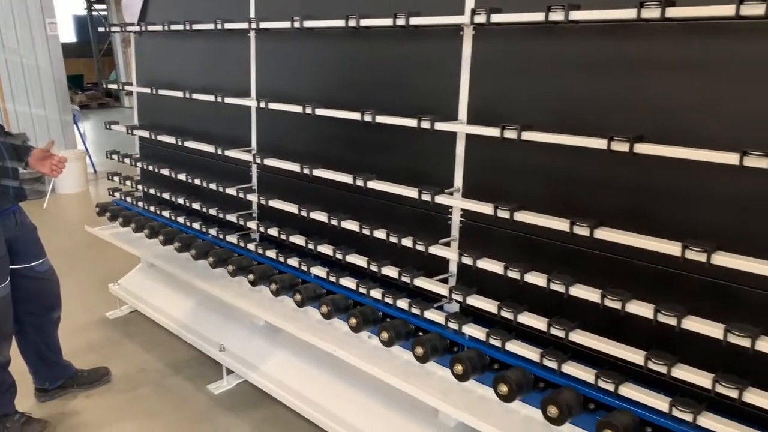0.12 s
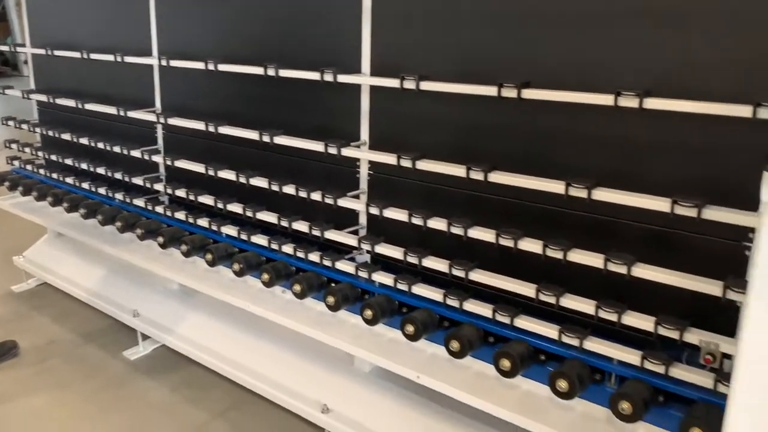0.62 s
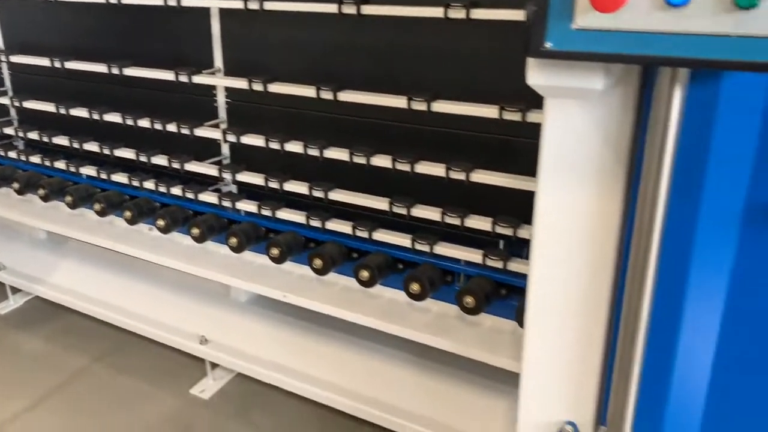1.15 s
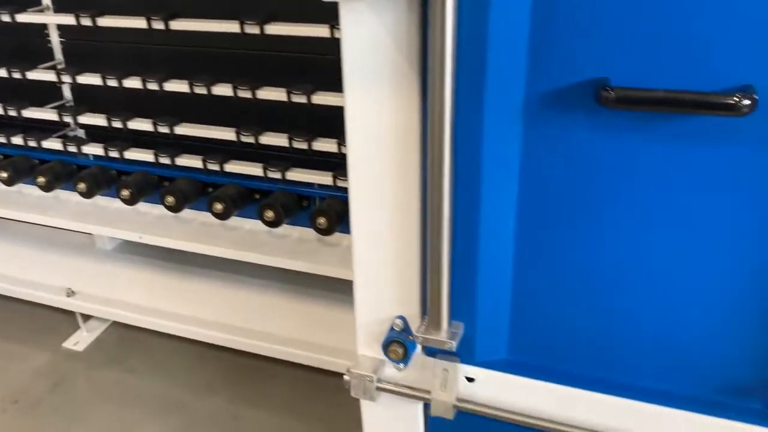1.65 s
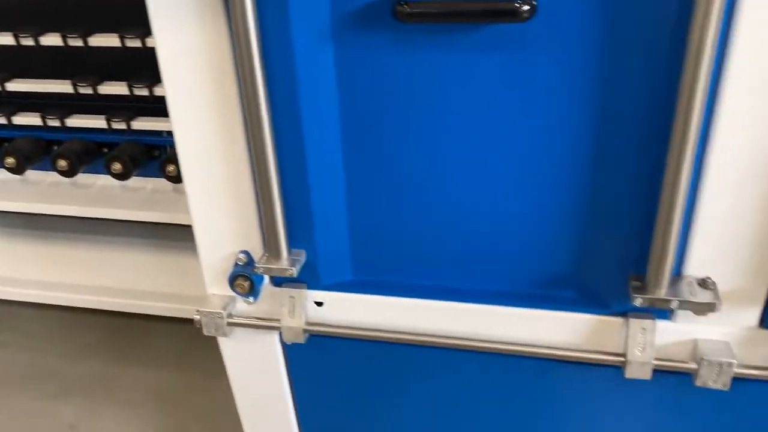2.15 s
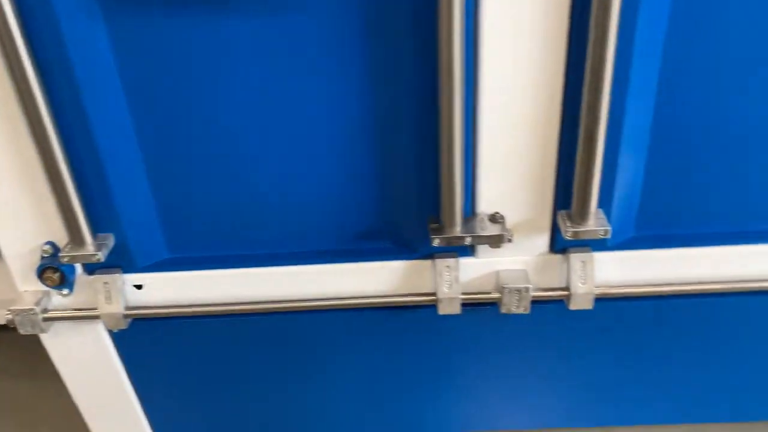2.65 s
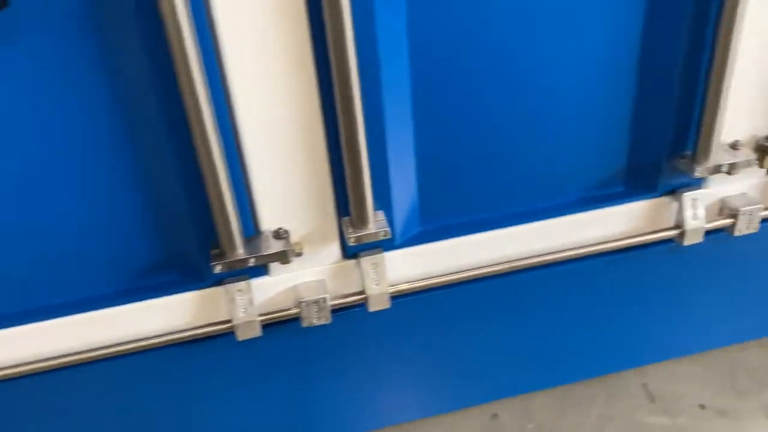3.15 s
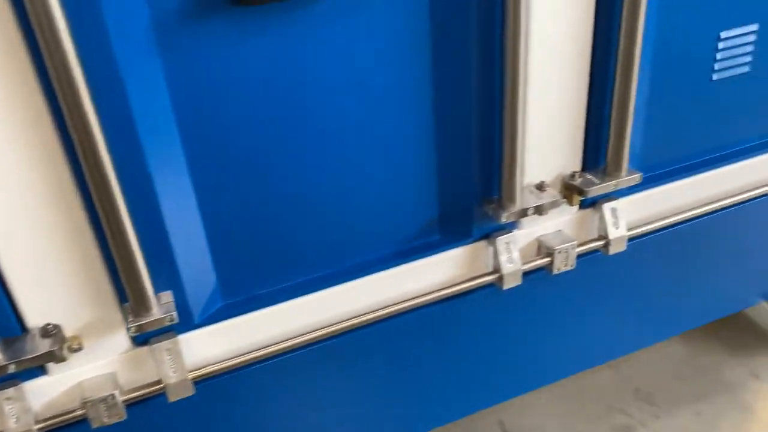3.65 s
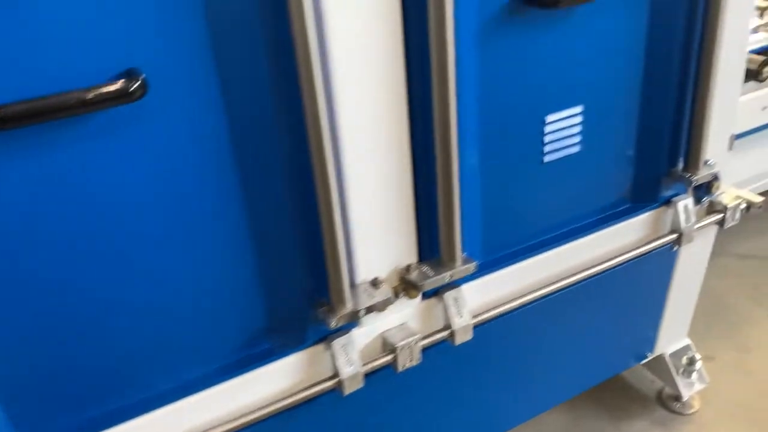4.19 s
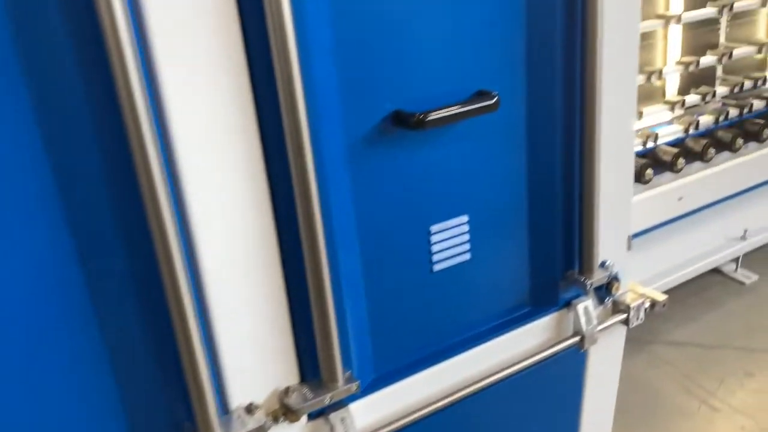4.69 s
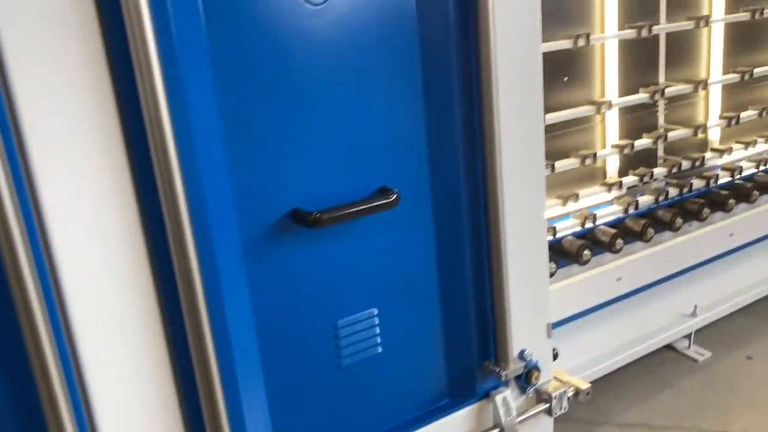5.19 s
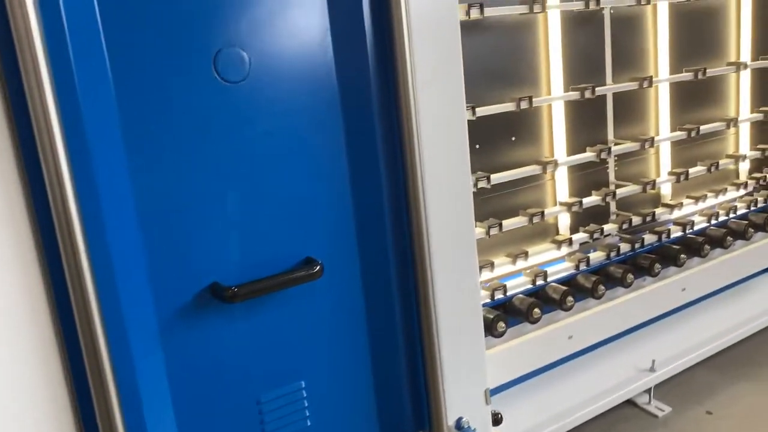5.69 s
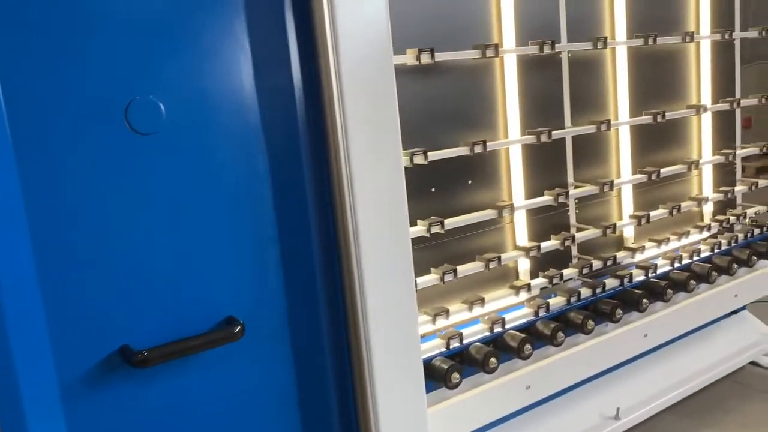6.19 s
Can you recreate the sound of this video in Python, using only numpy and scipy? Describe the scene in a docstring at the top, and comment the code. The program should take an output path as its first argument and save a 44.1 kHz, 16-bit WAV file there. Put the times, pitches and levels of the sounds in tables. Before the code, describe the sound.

In a reverberant factory hall, a big washing machine runs without pause. A blower's low, rushing roar and a deep booming drone dominate, with motor hum underneath. Grainy water spray swells in small surges, a thin air hiss sits on top, and faint conveyor rattles tick through. Heard in stereo by a microphone carried along the cabinet, the tone shifts gradually and a breathy whistle appears near the end.

```python
"""A drying blower roars through the ducts and sheet panels of a glass washer in a factory hall. The listener
walks along its cabinet: motors hum at their shaft rates, water sprays on brushes in surges, the conveyor
rattles faintly and an air knife hisses. Air and water are coloured noise, motors are wavering tones, and
rattles are tiny knocks that make metal ring. Two microphone ports a hand apart hear the air, water and motors
from the right."""
import sys
import numpy as np
from scipy import signal
from scipy.fft import rfft, irfft
from scipy.io import wavfile

SR = 44100
rng = np.random.default_rng(int(sys.argv[2]) if len(sys.argv) > 2 else 0)


def natural_amplitude(level_db):
    """Convert a level in decibels to a linear amplitude factor, elementwise."""
    exponent = np.asarray(level_db, float) / 20
    return 10 ** exponent


def wrap_up_sound(samples):
    """Save the sound to the file named by the first command line argument, as 16-bit audio."""
    columns = np.atleast_2d(samples).T
    # keep every value between -1 and 1, then stretch to whole-number steps
    tamed = np.clip(columns, -1, 1)
    steps = np.round(tamed * 32767).astype(np.int16)
    wavfile.write(sys.argv[1], SR, steps)


N = 278712
NOW = np.arange(N) / SR   # time of each sample, s
HZ = np.maximum(np.arange(N // 2 + 1) * SR / N, 1)   # pitches of the spectrum; from 1 so that its log exists


def in_time(rows):
    """Draws straight lines between the rows of a table, giving each column a value at every sample."""
    times, *columns = np.transpose(rows)
    return [np.interp(NOW, times, column) for column in columns]


def at_hz(points, column=1):
    """Reads a table column at every pitch of the spectrum, with pitch spaced in octaves."""
    points = np.array(points)
    return np.interp(np.log(HZ), np.log(points[:, 0]), points[:, column])


def drift(rate_hz):
    """Slow random wandering around 0 with spread 1: noise smoothed twice, made at every 40th sample."""
    r = np.exp(-2 * np.pi * rate_hz * 40 / SR)
    noise = rng.standard_normal(N // 40 + 2002)
    slow = signal.lfilter([1], [1, -2 * r, r * r], noise)[2000:]   # drop the filter's start
    return np.interp(np.arange(N) / 40, np.arange(len(slow)), slow / slow.std())


def uncovered(hidden_db, open_db, half_s, passage_s):
    """Level in dB as the cabinet ceases to shield a source; a negative passage_s runs it backwards."""
    return hidden_db + (open_db - hidden_db) / (1 + np.exp((half_s - NOW) / passage_s))


def standing(mean_db, db_per_s, crest_s, spacing_s, echo):
    """Level in dB where a wave meets its wall echo (0-1), crest and trough passing in turn."""
    both = 1 + echo * np.exp(2j * np.pi * (NOW - crest_s) / spacing_s)
    return mean_db + db_per_s * (NOW - NOW.mean()) + 20 * np.log10(np.abs(both))


# Pitches that ducts, panels and hall favour or swallow. Columns: pitch_hz, width_hz, lift_db
RESONANCE_TABLE = [(76.5, 6.5, -6.5), (97.5, 5.6, -7), (122, 3.8, 0), (130.4, 7.8, 5), (153.7, 15, 2),
                   (164.3, 17, 4.5), (184.7, 20.5, -9), (207, 4.4, -5.5), (213.7, 12.3, 5.5), (251, 9.9, 1),
                   (269.5, 14, 4.5), (284.5, 37, -7), (326, 20, 0.5), (342.4, 15.6, 3), (354, 10, 0.5),
                   (389, 33, 2), (439, 19, 2.5), (660, 110, 3.5), (770, 44, -1.5), (876, 130, 5),
                   (982, 34, 4.5), (1029.7, 50, -1.5), (1126, 34, 5.5), (1158, 37, -2.5), (1270, 89, 3.5),
                   (1350, 34, 5), (1400, 38, -5.5), (2523, 260, 4.5), (2940, 82, -2), (3030, 83, 3.5),
                   (3100, 82, 1.5), (4300, 210, 2.5), (4620, 200, -2), (9480, 200, 0)]


def body_db():
    """Bell-shaped lifts and dips of the cabinet and hall, in dB."""
    return sum(lift_db / (1 + (2 * (HZ - hz) / width_hz) ** 2) for hz, width_hz, lift_db in RESONANCE_TABLE)


# How the two ports hear each pitch. Columns: pitch_hz, likeness (0-1), left_minus_right_db
PORT_TABLE = [(50, .99, -2.3), (150, .93, -2.3), (300, .82, -1.7), (450, .5, -1.3), (650, .1, -1.2),
              (1000, .2, 0), (1400, .4, -.4), (2000, .22, -.4), (2800, .15, -.8), (3500, .1, -1.2),
              (4300, .4, -1.6), (5300, .1, -3.5), (6500, .45, -2), (7500, .8, 0), (8800, .98, .2)]


def at_ports(shared, own):
    """Spectra at the two ports: a shared wave reaching the left later, plus diffuse sound of each."""
    alike = at_hz(PORT_TABLE)
    left_lag_s = 9.6 / SR
    late = np.exp(-2j * np.pi * HZ * left_lag_s)
    delays = np.array([late, np.ones_like(late)])
    pair = np.sqrt(alike) * shared * delays + np.sqrt(1 - alike) * own
    half_gap_db = at_hz(PORT_TABLE, column=2) / 2
    return pair * natural_amplitude(half_gap_db * np.array([[1], [-1]]))


def hall(x, echo_db=-17.0, walk_m_s=0.6008, count=6):
    """Echoes off floor, walls and machines; walking changes their paths, so thin bands swell and slide."""
    out, sample = x.copy(), np.arange(N)
    for path_m, heading in rng.uniform([2.0, -1], [14.0, 1], (count, 2)):
        path_now_m = path_m + heading * walk_m_s * (sample - N / 2) / SR
        lag = path_now_m / 343 * SR   # sound covers 343 m/s
        out += natural_amplitude(echo_db) * np.array([np.interp(sample - lag, sample, side, period=N) for side in x])
    return out / np.sqrt(1 + count * natural_amplitude(2 * echo_db))


def turbulence(colour, patchy_db, patch_rate_hz, grain_db=0, count=2):
    """Coloured stereo noise whose bands, count to the octave, swell alone; grain roughens it into droplets."""
    grain = rng.standard_normal(N // 32 + 1).repeat(32)[:N]   # a new level every 32 samples
    source = rfft(rng.standard_normal((3, N)) * natural_amplitude(grain_db * grain))
    spectra = at_ports(source[0], source[1:]) * natural_amplitude(at_hz(colour) + body_db())
    lowest, highest = np.log2(colour[0][0]), np.log2(colour[-1][0])
    out = 0
    for centre in np.arange(lowest, highest + 1 / count, 1 / count):
        # neighbouring windows sum to one
        window = np.cos(np.pi / 2 * np.clip(count * (np.log2(HZ) - centre), -1, 1)) ** 2
        out = out + irfft(spectra * window, N) * natural_amplitude(patchy_db * drift(patch_rate_hz))
    return out / out.mean(axis=0).std()


def ring(drive, hz, t60_s):
    """One mode of a metal part: struck by the drive, it swings at its pitch and fades 60 dB in t60_s."""
    r, w = natural_amplitude(-60 / (t60_s * SR)), 2 * np.pi * hz / SR
    return signal.lfilter([0, np.sin(w)], [1, -2 * r * np.cos(w), r * r], drive + 1e-18)


# Faint rattles, each nearest the part that rings at its pitch. Columns: middle_s, level_db, pitch_hz
RATTLE_TABLE = [(.1, -52, 2440), (1.14, -48, 4210), (1.78, -52, 3025), (1.9, -50, 5300), (2.2, -47, 3210),
                (2.54, -44.5, 3025), (2.61, -44.5, 4300), (3.47, -51, 4420), (3.6, -48, 3025),
                (3.74, -46.5, 3790), (3.88, -49.5, 3025), (4.05, -48, 2530), (4.33, -45.5, 5300),
                (4.42, -48.5, 2530), (4.5, -51, 4420), (4.84, -47, 2100), (4.87, -48.5, 2450),
                (5.08, -49.5, 2530), (5.35, -48, 2530), (5.4, -50, 5300), (5.44, -54.5, 4210),
                (5.89, -46, 4420)]
# What the conveyor rings with. Columns: pitch_hz, level_db, t60_s
CONVEYOR_MODES = [(1444, -0.5, 0.15), (1873, -2, 0.13), (2100, -2.5, 0.1), (2440, -5.5, 0.07),
                  (2540, -1.5, 0.07), (3025, -2, 0.065), (3210, -5, 0.097), (3260, -10, 0.078),
                  (3640, -8.5, 0.06), (3790, -5.5, 0.06), (4210, -6, 0.076), (4420, -9.5, .06),
                  (5300, -10, 0.063)]


def rattles(burst_s=0.029):
    """Short runs of tiny knocks; each run strikes every mode with a strength of its own."""
    knocks = rng.standard_normal((2, N)) * (rng.random(N) < 500 / SR)   # about 500 a second
    knocks = (knocks + knocks[0]) / 2   # the right port shares part of the left's knocks
    # modes within about 0.04 octave of a rattle's pitch ring up to 8 dB louder than distant ones
    apart = np.log2(np.array(RATTLE_TABLE)[:, 2:] / np.array(CONVEYOR_MODES)[:, 0]) / 0.04
    nearness_db = 8.0 * (np.exp(-.5 * apart ** 2) - .5)
    strengths_db = rng.normal(0, 2.0, apart.shape) + nearness_db
    runs = np.array([natural_amplitude(db) * np.exp(-.5 * ((NOW - middle_s) / burst_s) ** 2)
                     for middle_s, db, hz in RATTLE_TABLE])
    out = np.zeros((2, N))
    for (hz, mode_db, t60_s), strength_db in zip(CONVEYOR_MODES, strengths_db.T):
        out += ring(knocks * (natural_amplitude(mode_db + strength_db) @ runs), hz, t60_s)
    return out


def chatter(level_db, per_s=900.0):
    """Rollers keep the conveyor's modes ringing faintly; each mode is busy now and then."""
    out = np.zeros((2, N))
    for hz, mode_db, t60_s in CONVEYOR_MODES:
        taps = rng.standard_normal((2, N)) * (rng.random(N) < per_s / SR)
        out += ring(taps * natural_amplitude(mode_db + 3.0 * drift(4.0)), hz, t60_s)
    return natural_amplitude(level_db) * out / out.std()


def strand(rows, width_hz):
    """Narrow noise around a sliding pitch: two slow drifts steer the size and phase of a wave."""
    hz, level_db = in_time(rows)
    turn = 2 * np.pi * np.cumsum(hz) / SR
    waves = np.array([drift(width_hz) * np.cos(turn) + drift(width_hz) * np.sin(turn) for _ in range(3)])
    spectra = rfft(natural_amplitude(level_db) * waves)
    return irfft(at_ports(spectra[0], spectra[1:]), N)


# Low, middle and high strands of narrow rough sound. Columns of each: time_s, pitch_hz, level_db
BOOM_PATH = [(0, 128, -25), (.6, 132, -18.5), (1.1, 135, -25), (1.8, 125, -19.5), (2.2, 140, -20),
             (2.6, 150, -20.5), (3.3, 152, -21), (3.9, 160, -17.5), (4.5, 152, -21), (5.1, 146, -19),
             (5.45, 133, -20), (5.72, 130, -23), (6.0, 126, -17), (6.32, 128, -22.5)]
PANEL_HUM_PATH = [(0, 330, -32), (.8, 328, -28), (1.12, 326, -37.5), (1.5, 325, -30), (2.4, 322, -26),
                  (2.8, 322, -30.5), (3.6, 327, -22.5), (3.9, 327, -41), (4.2, 325, -34),
                  (4.52, 327, -19.5), (4.72, 325, -33.5), (5.0, 324, -31.5), (5.5, 324, -28),
                  (5.8, 322, -38), (6.05, 321, -26.5), (6.32, 321, -29)]
WHINE_PATH = [(0, 2525, -49), (.75, 2532, -50), (.9, 2520, -58), (1.15, 2535, -48), (1.45, 2506, -49),
              (1.74, 2530, -50), (2.0, 2543, -55), (2.3, 2537, -49), (2.57, 2500, -46), (2.75, 2532, -53),
              (3.2, 2540, -60), (4.0, 2540, -53), (4.4, 2490, -46), (4.6, 2550, -53), (4.87, 2490, -51),
              (5.2, 2510, -51), (5.38, 2490, -46), (5.7, 2520, -52), (6.32, 2520, -55.5)]
# A breathy whistle near the outlet. Columns: time_s, pitch_hz, level_db
WHISTLE_PATH = [(4.9, 1300, -59), (5.13, 1335, -41), (5.22, 1370, -44), (5.33, 1360, -31.5),
                (5.42, 1280, -44), (5.58, 1260, -35), (5.7, 1240, -50), (5.9, 1250, -36), (6.02, 1290, -37),
                (6.12, 1270, -44), (6.27, 1280, -35)]


def strands():
    """Rough strands wander as the walk crosses the hall's standing waves, and the outlet whistles."""
    low = strand(BOOM_PATH, width_hz=15.8) + strand(PANEL_HUM_PATH, width_hz=7.3)
    high = strand(WHINE_PATH, width_hz=50.0) + strand(WHISTLE_PATH, width_hz=35.0)
    return low + high


def tone(hz, level_db):
    """A tone at both ports, wavering a little in pitch and level."""
    turn = 2 * np.pi * np.cumsum(hz * (1 + 0.006 * drift(1.62))) / SR + rng.uniform(0, 2 * np.pi)
    wave = rfft(np.sqrt(2) * natural_amplitude(level_db + 2.4 * drift(4.0)) * np.sin(turn))
    return irfft(at_ports(wave, wave), N)


# The shaft tone at its turning rate, as the walk crosses its nodes. Columns: time_s, level_db
SHAFT_LEVELS = [(0, -25), (.35, -26.5), (.5, -29.5), (1.3, -30), (1.7, -33.5), (2.7, -34), (3.7, -28),
                (4.15, -24.5), (4.6, -26.5), (5.6, -26), (6.32, -27)]
# Standing waves of the shaft's second and fourth multiples.
# Columns: mean_db, trend_db_per_s, crest_s, crest_to_crest_s, wall_echo (0-1)
MULTIPLE_WAVES = [(-31, -1, 2.73, 5, 0.74), (-33.5, 0.5, 0.82, 4.8, 0.37)]


def hum(shaft_hz=48.4, pump_hz=77.3):
    """Unbalance of the shafts shakes the frame at the turning rate and its multiples."""
    out = tone(shaft_hz, in_time(SHAFT_LEVELS)[0])
    for multiple, wave in zip((2, 4), MULTIPLE_WAVES):
        out = out + tone(multiple * shaft_hz, standing(*wave))
    return out + tone(pump_hz, uncovered(hidden_db=-41, open_db=-25, half_s=2.5, passage_s=1))


# Surges of water in the wash section. Columns: peak_s, lift_db, dies_in_s
SURGE_TABLE = [(.12, 1.5, 0.061), (.6, 1.5, 0.22), (1.12, 1, 0.14), (1.72, 2, 0.16), (2.2, 1, 0.098),
               (2.54, 3.5, 0.085), (2.8, 1, .1), (3.47, 2.0, 0.081), (3.61, 2.5, .12), (3.78, 2, 0.12),
               (4.05, 2.5, 0.25), (4.42, 2, 0.083), (4.87, 2.5, 0.064), (5.08, 2.5, 0.26),
               (5.38, 1.5, 0.12), (5.88, 2.5, 0.24), (6.28, 2, 0.22)]


def surges_db(rise_s=0.066):
    """Lift in dB: each surge rises quickly and dies away in its own time."""
    total = 0
    for peak_s, lift_db, dies_s in SURGE_TABLE:
        spread_s = np.where(NOW < peak_s, rise_s, dies_s)
        total = total + lift_db * np.exp(-.5 * ((NOW - peak_s) / spread_s) ** 2)
    return total


# Colours of the air knife's hiss and of its slit. Columns of each: pitch_hz, level_db
KNIFE_COLOUR = [(4800, -16.5), (6300, -2), (8200, 1), (9000, 0.5), (10500, -5.5), (12000, -13),
                (13500, -21), (15000, -22.5), (16000, -33.5)]
SLIT_COLOUR = [(9000, -15), (11500, 2), (13500, -4), (14900, -3.5), (16000, -28)]


def air_knife():
    """Air tears through a narrow slit as high hiss, which swells with a share of each water surge."""
    knife_db = uncovered(hidden_db=-56, open_db=-53.5, half_s=2, passage_s=0.5) + 0.81 * surges_db()
    slit_db = uncovered(hidden_db=-81.5, open_db=-61.5, half_s=2.5, passage_s=0.5)
    knife = turbulence(KNIFE_COLOUR, patchy_db=0.7, patch_rate_hz=9.7, grain_db=1.0)
    slit = turbulence(SLIT_COLOUR, patchy_db=2.0, patch_rate_hz=5.0, grain_db=2.5)
    return natural_amplitude(knife_db) * knife + natural_amplitude(slit_db) * slit


def surging(x, level_db, side_share=.55):
    """Surges swell fully in what the ports have in common; what differs between them follows only in part."""
    mid, side = (x[0] + x[1]) / 2, (x[0] - x[1]) / 2
    side_db = level_db.mean() + side_share * (level_db - level_db.mean())
    return natural_amplitude(level_db) * mid + natural_amplitude(side_db) * side * np.array([[1], [-1]])


# Colour of water on brushes. Columns: pitch_hz, level_db
SPRAY_COLOUR = [(1100, -19), (1600, -5.5), (2100, -5.5), (2800, -10), (3500, -10.5), (4400, -15),
                (5200, -18), (6000, -22), (7500, -30)]


def spray(level_db):
    """Water breaks into droplets on the brushes: grainy noise that echoes in the hall and surges."""
    water = turbulence(SPRAY_COLOUR, patchy_db=1.1, patch_rate_hz=8.0, grain_db=1.6, count=6)
    return surging(hall(water), level_db)


# Colours of the low drone and of its deep and upper booms. Columns of each: pitch_hz, level_db
DRONE_COLOUR = [(22, -35.5), (33, -18), (42, -8.5), (62, -8), (100, -5.5), (140, -2.5), (200, -5.5),
                (280, -10), (400, -31)]
DEEP_COLOUR = [(80, -26.5), (100, -2.5), (113, 0), (128, 2.5), (160, -29)]
UPPER_COLOUR = [(170, -16), (205, 1), (240, -3), (270, -5.5), (320, -25)]


def drone():
    """Low noise with two booms that swell and sink as the walk crosses their standing waves."""
    low_db = uncovered(hidden_db=-19.5, open_db=-17, half_s=2.5, passage_s=0.3)
    deep_db = standing(mean_db=-30, db_per_s=-2.4, crest_s=2.5, spacing_s=3.5, echo=0.95)
    upper_db = standing(mean_db=-28.5, db_per_s=1.2, crest_s=4.5, spacing_s=3.5, echo=0.1)
    out = natural_amplitude(low_db) * turbulence(DRONE_COLOUR, patchy_db=0.9, patch_rate_hz=4.0, count=3)
    out += natural_amplitude(deep_db) * turbulence(DEEP_COLOUR, patchy_db=0.5, patch_rate_hz=2.2)
    out += natural_amplitude(upper_db) * turbulence(UPPER_COLOUR, patchy_db=0.5, patch_rate_hz=0.93)
    return out


# Colour of the blower's roar. Columns: pitch_hz, level_db
ROAR_COLOUR = [(200, -35), (300, 0), (450, -3), (700, -9.5), (1000, -16.5), (1400, -17.5), (2000, -30)]


def blower():
    """Rushing air roars through ducts and sheet panels, as patchy noise with moving echoes."""
    roar_db = uncovered(hidden_db=-24.5, open_db=-23, half_s=3.5, passage_s=0.9)
    return hall(natural_amplitude(roar_db) * turbulence(ROAR_COLOUR, patchy_db=0.8, patch_rate_hz=5.0, count=4))


def scene():
    """All sources together in stereo."""
    spray_db = uncovered(hidden_db=-42, open_db=-41, half_s=5.5, passage_s=-4) + surges_db()
    conveyor = rattles() + chatter(spray_db - 14.5)   # the chatter swells with the spray
    machine = strands() + hum() + air_knife() + spray(spray_db)
    return conveyor + machine + drone() + blower()


def band_limit(x):
    """A steep low-pass at the top of the band."""
    return signal.sosfilt(signal.butter(12, 15290, fs=SR, output="sos"), x)


def record(dry):
    """Finishes the mix: a smooth curve rounds the peaks softly."""
    mix = 1.548 * np.tanh(dry / 1.663)
    return band_limit(mix)


dry = scene()
out = record(dry)
wrap_up_sound(out)
```